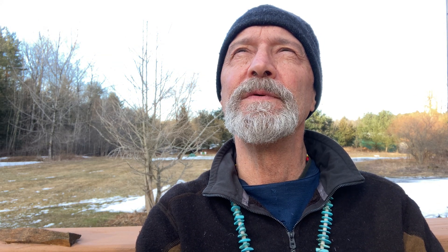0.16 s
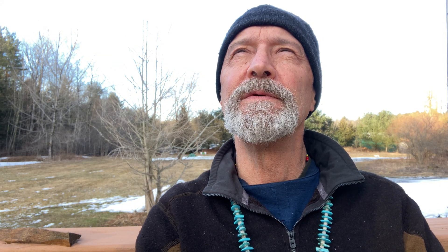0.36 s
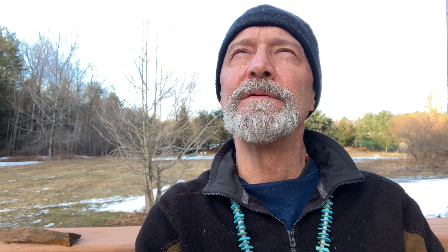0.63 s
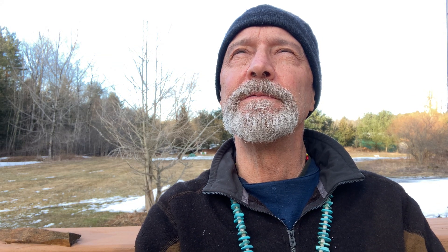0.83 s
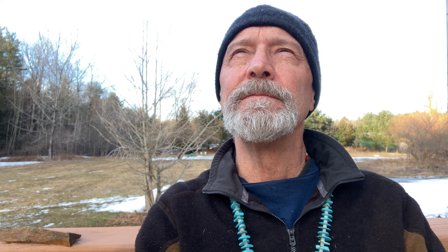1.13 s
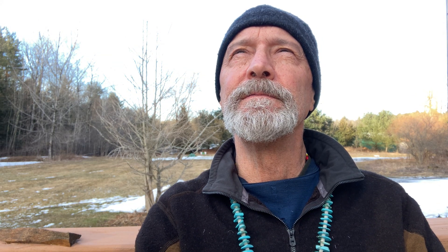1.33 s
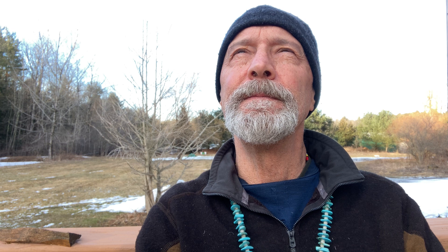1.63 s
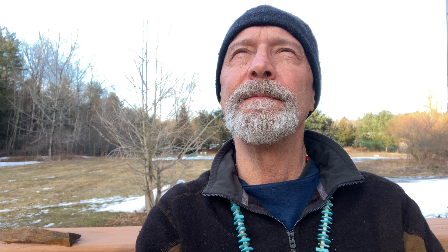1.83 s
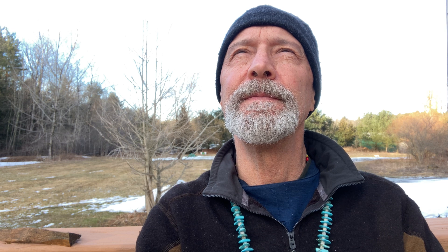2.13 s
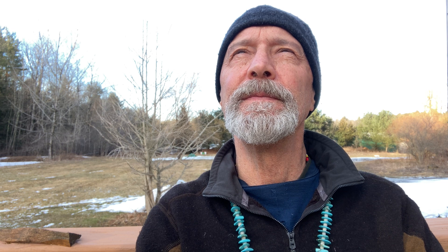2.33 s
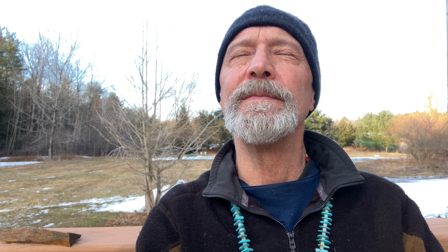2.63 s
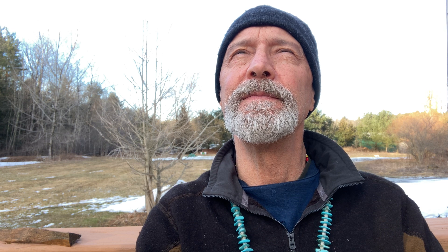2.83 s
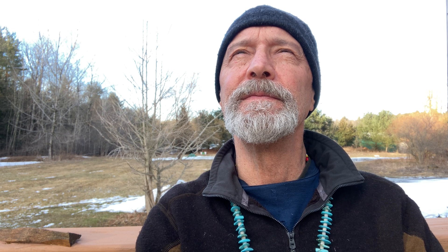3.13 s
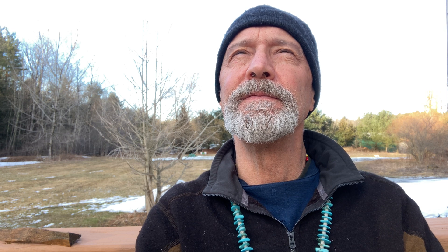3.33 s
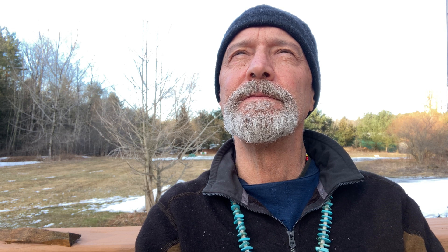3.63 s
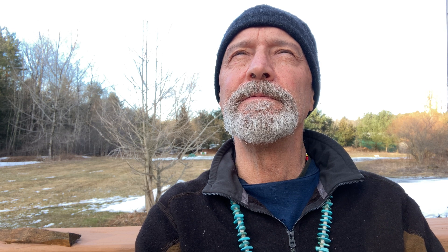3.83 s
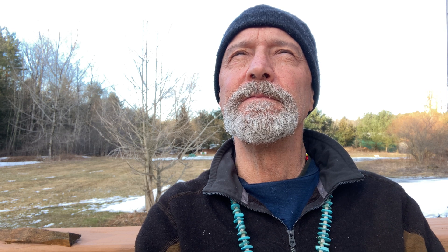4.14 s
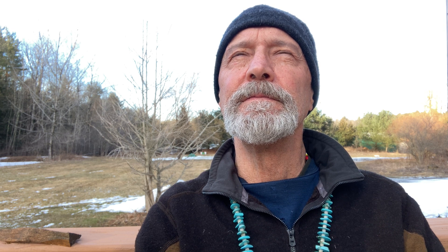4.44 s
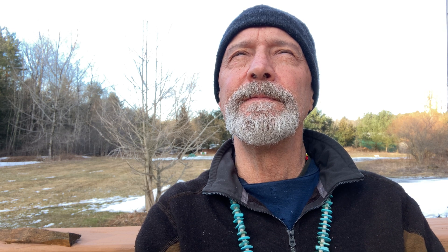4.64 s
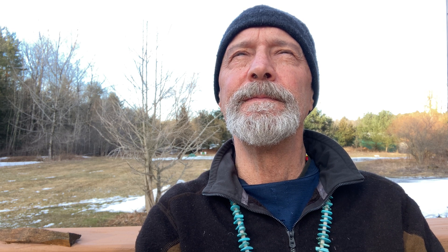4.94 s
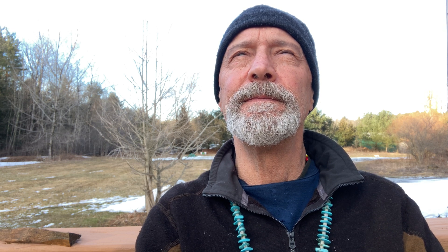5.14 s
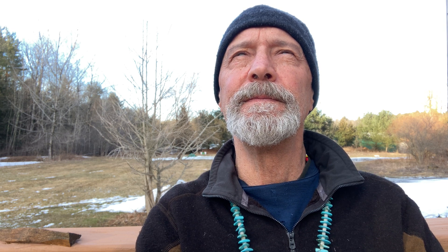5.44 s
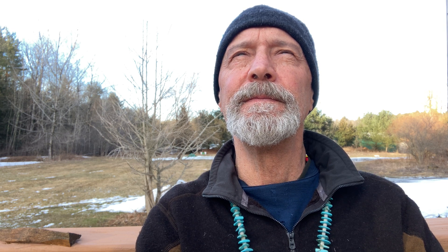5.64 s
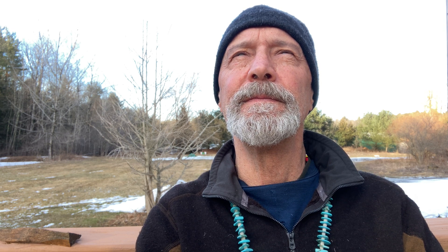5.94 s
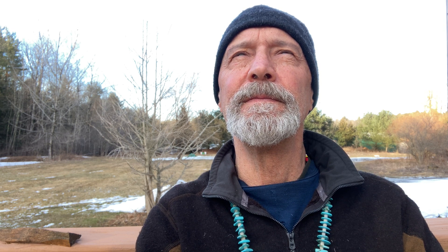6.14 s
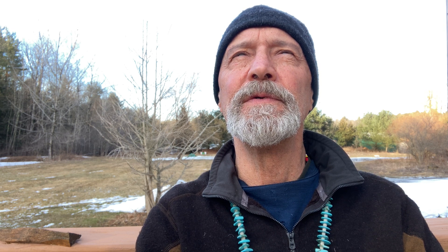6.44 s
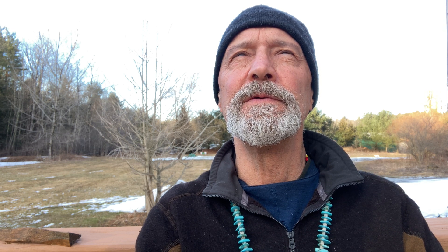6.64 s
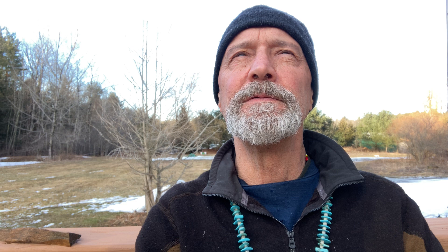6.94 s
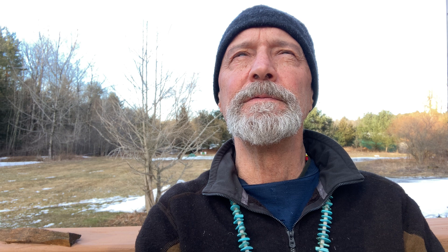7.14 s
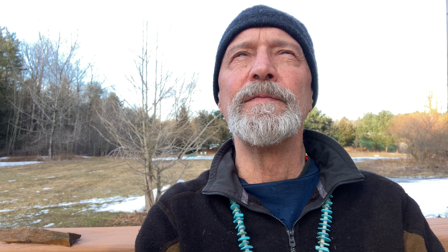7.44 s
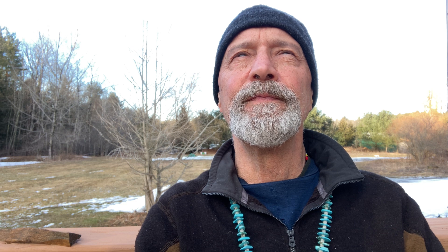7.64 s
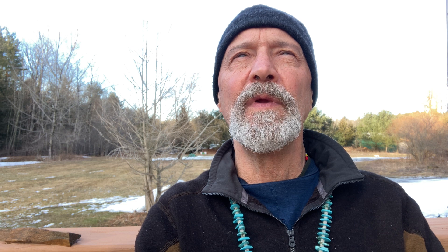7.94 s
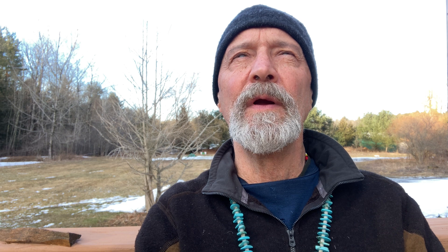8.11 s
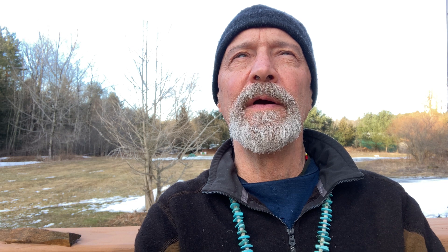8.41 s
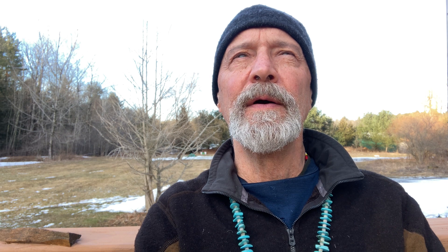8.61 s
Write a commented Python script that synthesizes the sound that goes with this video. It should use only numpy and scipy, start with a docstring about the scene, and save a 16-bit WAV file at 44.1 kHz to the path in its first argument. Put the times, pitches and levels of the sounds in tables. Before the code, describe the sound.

Outdoors, one crow caws fourteen times, raspy and echoing among trees, growing duller and quieter over soft wind buffeting and faint country hush.

```python
"""A crow caws fourteen times from the edge of a wood, softer on the whole as it goes on; a farther one answers once.
Each caw is a hoarse arch of pitch: frayed harmonics and puffed noise through throat and beak resonances.
Noise echoes stand for the trees that scatter and prolong it. Eddies are smooth pushes, cut in the bass;
light wind is lumpy low noise swelling in gusts; ticks, clicks and a faint high chirp are short resonant
bursts over a quiet country hush."""
import sys
import numpy as np
from scipy import signal
from scipy.fft import rfft, irfft, next_fast_len
from scipy.io import wavfile
from scipy.ndimage import map_coordinates

SR = 44100
rng = np.random.default_rng(int(sys.argv[2]) if len(sys.argv) > 2 else 0)


def generate_wav(signal):
    """Clip the signal to [-1, 1] and save it as 16-bit WAV at the path in sys.argv[1]."""
    frames = np.transpose(np.atleast_2d(signal))
    scaled = np.clip(frames, -1, 1) * 32767
    pcm = np.round(scaled).astype(np.int16)
    wavfile.write(sys.argv[1], SR, pcm)


N = 386757


def amp(db):
    """Decibels to gain."""
    return 10 ** (np.asarray(db) / 20)


def unit(x):
    """Scale to rms 1."""
    return x / np.sqrt(np.mean(x ** 2) + 1e-20)


def along(points, hz):
    """Interpolate (Hz, value) points on a log frequency axis."""
    f, v = np.transpose(points)
    return np.interp(np.log(hz + 1), np.log(f + 1), v)


def bell(hz, centre_hz, octaves):
    """A bump of height 1 on a log frequency axis."""
    return np.exp(-(np.log2((hz + 1) / centre_hz) / octaves) ** 2)


def wobble(rate_hz, size):
    """A smooth random curve with rate_hz knots a second."""
    knots = rng.standard_normal(int(size * rate_hz / SR) + 4)
    return map_coordinates(knots, [np.arange(size) * rate_hz / SR])


def filtered(x, response):
    """Multiply the spectrum of x by a response of frequency."""
    n = x.shape[-1]
    m = next_fast_len(n + 4096)
    return irfft(rfft(x, m) * response(np.fft.rfftfreq(m, 1 / SR)), m)[..., :n]


def add(track, start_s, sound):
    """Mix a sound into the track from start_s."""
    i = round(start_s * SR)
    part = sound[..., max(-i, 0):N - i]
    track[..., max(i, 0):max(i, 0) + part.shape[-1]] += part


def rush(spectrum, alike):
    """Stereo noise of rms 1; the mid-side balance sets left-right likeness by frequency."""
    def mid_side_gains(hz):
        turn = np.arccos(np.clip(along(alike, hz), -1, 1)) / 2
        return amp(along(spectrum, hz)) * [np.cos(turn), np.sin(turn)]

    mid, side = filtered(rng.standard_normal((2, N)), mid_side_gains)
    return unit(np.array([mid + side, mid - side]))


def effort(u):
    """Force of a caw, u from its crest: quick attack, swell to the peak, sag, release."""
    hold_from, peak_at, hold_to = -.99, -.37, 1.34
    attack_db, swell_db, sag_db, release_db = 106, 8.5, 4, 56.5  # per unit of u
    arch_db = swell_db * np.maximum(peak_at - u, 0) + sag_db * np.maximum(u - peak_at, 0)
    ends_db = attack_db * np.maximum(hold_from - u, 0) + release_db * np.maximum(u - hold_to, 0)
    return amp(-arch_db - ends_db)


def caw(top_hz, half_s, treble_db, nasal_db, beak_db, throat_scale, length):
    """One caw, crest in the middle: rattling harmonics arch through the throat, with rasp puffed once a cycle."""
    # Throat and beak resonances. Each row: frequency in Hz before throat_scale, gain in dB.
    throat = [(400, -62), (650, -24), (900, -27), (1080, -15), (1200, -3.5), (1300, 2), (1410, 1.5),
              (1510, -10), (1720, -8), (1950, -19), (2300, -25.5), (2900, -37), (3300, -24), (3750, -19),
              (4400, -29), (5300, -22.5), (6050, -26.5), (6900, -74)]
    # Rasp of the syrinx. Each row: frequency in Hz before throat_scale, relative density in dB per Hz.
    rasp_spectrum = [(450, -29.5), (1000, -8), (1350, -11), (1900, -5.5), (2350, -11.5), (2850, -18),
                     (3450, -12), (3950, -14.5), (4450, -18.5), (5300, -14), (6200, -15.5), (7100, -57)]
    # Treble loss of soft caws. Each row: frequency in Hz before throat_scale, share of treble_db that acts.
    softening = [(1750, 0.033), (2300, 0.21), (2900, 0.52), (3400, 0.54), (4200, 0.8), (5300, 1.42),
                 (7000, 1.5)]
    rise_share, low_share = .93, .63  # rise time in half lengths; pitch at the loose ends over top_hz
    rattle_hz, rattle_share = 72, .016
    beak_from_hz, beak_rise_per_half = 2550, .096
    noise_db, ragged_db, rasp_fade_db_per_half = -25, 7, 4

    n = SR // 3
    u = (np.arange(n) - n // 2) / SR / half_s
    # membranes: tight at the crest, loose and ragged at both ends
    slack = 1 - np.exp(-(u / np.where(u < 0, rise_share, 2 - rise_share)) ** 2)
    jitter = (.012 + .03 * slack) * wobble(800, n) + .008 * wobble(150, n)
    # slower, uneven vibration of the syrinx, with a peak at the crest
    turns = np.cumsum(rattle_hz * (1 + .2 * wobble(50, n))) / SR
    rattle = np.cos(2 * np.pi * (turns - turns[n // 2])) - .5
    pitch_hz = top_hz * (1 - (1 - low_share) * slack) * (1 + jitter + rattle_share * rattle)
    phase = 2 * np.pi * np.cumsum(pitch_hz) / SR

    def edge(hz):
        """Treble loss and this caw's own nasal and beak resonances."""
        throat_hz = hz / throat_scale
        soft_db = treble_db * along(softening, throat_hz)
        # the third harmonic sweeps through the nasal resonance
        return amp(soft_db + nasal_db * bell(throat_hz, 1736, .1) + beak_db * bell(hz, 3320, .081))

    def tract(hz, beak):
        """Table frequency; resonances in the octave above beak_from_hz climb with the beak position."""
        upper = (hz > beak_from_hz) * (hz < 2 * beak_from_hz)
        return hz / throat_scale / (1 + beak_rise_per_half * beak * upper)

    beak = np.clip(u, -1, 1)
    voice = np.zeros(n)
    for k in np.arange(1, 14):
        # harmonics flutter independently, from the third up more deeply
        shimmer = unit(amp((2.8 if k < 3 else 4.5) * wobble(130, n)))
        fray = .09 * k * wobble(420, n)  # higher harmonics fray into hoarse noise
        gain = amp(along(throat, tract(k * pitch_hz, beak))) * edge(k * pitch_hz)
        voice += shimmer * gain * np.sin(k * phase + fray)

    puffs = rng.standard_normal(n) * (1 + np.cos(phase))
    rasp = np.zeros(n)
    for position in (-1, 0, 1):  # cross-fade three beak positions
        coloured = filtered(puffs, lambda hz: amp(along(rasp_spectrum, tract(hz, position))))
        rasp += np.maximum(1 - abs(beak - position), 0) * unit(coloured)
    rasp = filtered(rasp, edge) * amp(noise_db + ragged_db * slack - rasp_fade_db_per_half * u)
    return effort(u / length) * (1.247 * voice + rasp)


def trees():
    """Echo paths: trunks and twigs scatter at once, the grove swells after, the depth of the wood rings on longest."""
    # Decay of the deep wood. Each row: frequency in Hz, t60 in seconds.
    wood = [(500, 0.48), (1300, 2.74), (2000, 2.9), (3500, 1.55), (6000, 0.45)]
    early_db, early_t60_s, early_treble_db = -15, .18, 8
    grove_db, grove_t60_s, grove_treble_db = -19, .45, 5
    depth_db, onset_s = -10, .0045  # the depth sounds almost at once

    n = 3 * SR // 2
    t = np.arange(n) / SR
    trunks = rng.standard_normal((2, n)) ** 3 * amp(-60 * t / early_t60_s) * (t > .002)
    trunks = unit(trunks) / np.sqrt(n)
    # twigs scatter the treble most
    trunks = filtered(trunks, lambda hz: amp(along([(1350, 0), (3000, early_treble_db)], hz)))

    grove = unit(rng.standard_normal((2, n)) * t * amp(-60 * t / grove_t60_s)) / np.sqrt(n)
    grove = filtered(grove, lambda hz: amp(along([(1350, .0048), (1900, grove_treble_db)], hz)))

    hz, age_s, z = signal.stft(rng.standard_normal((2, n)), SR, nperseg=256)
    decay = amp(-60 * age_s / along(wood, hz)[:, None])
    onset = 1 - np.exp(-t / onset_s)
    depth = signal.istft(z * decay, SR, nperseg=256)[1][:, :n] * onset
    depth = depth / np.linalg.norm(amp(-60 * t / along(wood, 1400)) * onset)
    clumps = amp(2 * wobble(55, n))  # stands of trees answer one after another
    return amp(early_db) * trunks + amp(grove_db) * grove + amp(depth_db) * clumps * depth


def crow(calls, throat_scale, length, gain_db):
    """Each caw arrives straight, off the ground, off the wood's edge, and scattered through the trees."""
    ground_ms, twigs_db, trunk_db = 3.73, -2.5, -13
    echo_db, echo_s = -18, .07
    out, sides = np.zeros((2, N)), np.array([[1], [-1]])
    for crest_s, top_hz, half_s, db, treble_db, nasal_db, beak_db, pan_db, lead_ms, ground in calls:
        call = caw(top_hz, half_s, treble_db, nasal_db, beak_db, throat_scale, length)
        call = amp(db + gain_db) * call
        start_s = crest_s - len(call) / SR / 2

        def straight_path(hz):
            """Twigs take treble; the left port leads by lead_ms."""
            twigs = amp(along([(2000, 0), (3200, twigs_db)], hz))
            return twigs * np.exp(1j * np.pi * hz * sides * lead_ms / 1000)

        direct = filtered(call, straight_path)
        # gliding harmonics cross the bounce's peaks and notches and break into bursts
        near = filtered(direct, lambda hz: 1 - ground * np.exp(-2j * np.pi * hz * ground_ms / 1000))
        near = near * amp(sides * pan_db / 2 - 1.5)
        add(out, start_s, near)
        add(out, start_s + rng.uniform(.008, .02), amp(trunk_db) * near)
        add(out, start_s + echo_s + rng.normal(0, .0047), amp(echo_db) * direct)

        scattered = signal.fftconvolve(call[None], trees(), axes=1)
        # the scattered sound flickers, differently at each port
        flicker = amp(2 * np.array([wobble(130, scattered.shape[1]) for _ in sides]) - .5)
        add(out, start_s, flicker * scattered)
    return out


def eddies():
    """Each eddy pushes smoothly, a little unlike at the two ports; the microphone's bass cut makes it a falling thud."""
    # Each row: time of the peak in seconds, level in dB before the bass cut, width in seconds.
    pushes = [ (.076, -20.5, 0.0076), (0.396, -29, 0.0074), (0.503, -16, 0.0033), (0.6, -20.5, 0.0083),
              (0.634, -30, 0.0036), (0.743, -31, 0.0057), (0.829, -29, 0.0061), (.88, -26.5, 0.0082),
              (1.239, -22, .0025), (1.667, -24, 0.0061), (2.317, -24.5, 0.0046), (2.338, -23, 0.0049),
              (2.398, -14.5, 0.0045), (2.564, -26.5, 0.0065), (2.588, -16.5, 0.0039), (2.86, -36, 0.0031),
              (2.894, -25.5, 0.0038), (2.969, -19, 0.0045), (2.987, -27, 0.0042), (3.798, -24.5, 0.0046),
              (3.926, -25.5, 0.0057), (4.463, -27.5, 0.0072), (4.572, -29, 0.0041), (4.596, -25, 0.0031),
              (4.81, -19, 0.0048), (4.881, -35, 0.0044), (5.127, -20, 0.008), (8.355, -30, 0.0059),
              (8.52, -27.5, 0.0071), (8.568, -24.5, 0.0076)]
    uneven, bass_cut_hz = .096, 58
    track, t = np.zeros((2, N)), np.arange(-SR // 10, SR // 10) / SR
    for peak_s, db, width_s in pushes:
        flutter = 1 + uneven * np.array([wobble(247.7, len(t)), wobble(250.9, len(t))])
        shape = np.hanning(len(t)) / np.hypot(1, t / width_s) ** 3
        add(track, peak_s + t[0], amp(db) * flutter * shape)
    return signal.sosfilt(signal.butter(5, bass_cut_hz, "high", fs=SR, output="sos"), track)


def wind():
    """Lumpy low buffeting: a calm breeze on which gusts swell and die away, some sharper than others."""
    # Wind on the microphone. Each row: frequency in Hz, relative density in dB per Hz.
    buffet_spectrum = [(12, -32.5), (25, -8), (43, -1), (62, 3), (120, -8.5), (190, -19.5), (270, -37),
                       (400, -33.5), (800, -99)]
    # Each row: time of the peak in seconds, half length in seconds, level in dB before gain_db,
    # sharpness in dB added above split_hz.
    gusts = [ (0.137, 0.17, -52, 1.5), (0.542, 0.11, -40, -9), (0.832, 0.13, -56, -14),
             (1.649, 0.093, -54, 8.5), (1.906, 0.14, -65, 10.5), (2.316, 0.055, -49.5, 1.5),
             (2.916, 0.051, -49.5, 5), (3.27, 0.099, -56, -2), (3.83, 0.24, -57, 5), (4.537, 0.077, -45, 1),
             (4.805, 0.097, -46, -3.5), (5.21, 0.38, -56.5, -1.5), (8.264, 0.24, -56.5, -3),
             (8.54, 0.081, -50, -13)]
    calm_db, gain_db = -66.5, 1  # calm_db is before gain_db
    lumps_db, split_hz = 4, 90

    t = np.arange(N) / SR
    noise = rush(buffet_spectrum, [(60, .81), (300, .92)])
    buffet = unit(amp(lumps_db * wobble(25, N)) * noise)
    deep = filtered(buffet, lambda hz: 1 / (1 + (hz / split_hz) ** 4))

    def swell(sharp_share):
        """Calm and gusts add in power."""
        power = amp(calm_db) ** 2
        for peak_s, half_s, db, sharp_db in gusts:
            rise_and_fall = np.exp(-2 * ((t - peak_s) / half_s) ** 2)
            power = power + amp(db + sharp_share * sharp_db) ** 2 * rise_and_fall
        return np.sqrt(power)

    return amp(gain_db) * (swell(0) * deep + swell(1) * (buffet - deep))


def background():
    """Far hush of open country, low and middle bands swelling each on its own, over the microphone's hiss."""
    # Each row of both spectra: frequency in Hz, relative density in dB per Hz.
    hush_spectrum = [(25, -22), (60, -5), (160, -5.5), (300, -16.5), (480, -10.5), (780, -12),
                     (1000, -15.5), (1270, -14), (1500, -22), (1900, -31.5), (2400, -34.5), (3300, -37.5),
                     (5000, -39.5), (7000, -49.5), (12000, -72)]
    hiss_spectrum = [(3000, -20), (6500, -8), (8700, 0), (11400, -5), (13500, -3), (15200, -3)]
    # Each row: frequency in Hz, left-right likeness from -1 to 1.
    hush_alike = [(60, -0.1), (300, 0.87), (650, 0.23), (1400, -0.14), (3000, -0.12), (14000, 0.065)]
    hush_db, hiss_db, drift_db = -64.5, -83.7, 1.64

    sway = amp(.6 * wobble(4, N))
    hush = amp(hush_db) * sway * rush(hush_spectrum, hush_alike)
    for centre_hz in (330, 750):
        band = filtered(hush, lambda hz: bell(hz, centre_hz, .72))
        hush = hush + band * (amp(drift_db * wobble(4.6, N)) - 1)
    return hush + amp(hiss_db) * rush(hiss_spectrum, [(8000, 0)])


def ticks():
    """Tiny short sounds, ticks, clicks and a faint high chirp: noise that dies at once, through a band-pass."""
    # Each row: start in seconds, peak in dB, centre in Hz, width in octaves (at least 0.1 is used).
    short_sounds = [ (0.958, -70, 2470, 0.486), (3.188, -68.5, 3010, 3.6), (4.29, -71, 4370, 0.22),
                    (4.546, -45, 925, 0.66), (4.547, -63.5, 2450, 0.22), (4.547, -64, 4680, 0.39),
                    (6.599, -51.5, 1224, 0.25), (7.623, -68, 9500, 0.23), (7.828, -70, 2750, 1.3),
                    (8.11, -57.5, 2670, 0.56), (8.622, -64, 14800, .39)]
    t60_s = .048
    out, t = np.zeros((2, N)), np.arange(SR // 10) / SR
    for start_s, db, centre_hz, octaves in short_sounds:
        band_hz = centre_hz * 2.0 ** (np.array([-1, 1]) * max(octaves, .1) / 2)
        band_hz = np.clip(band_hz, 20, SR / 2 - 1)
        noise = rng.standard_normal(len(t)) + .5 * rng.standard_normal((2, len(t)))
        burst = noise * amp(-60 * t / t60_s)
        click = signal.sosfilt(signal.butter(2, band_hz, "band", fs=SR, output="sos"), burst)
        add(out, start_s, amp(db) * click / np.abs(click).max())
    return out


def scene():
    """Crows in the wood, wind and tiny short sounds at the microphone."""
    # Each row of both: crest in seconds, nominal top pitch in Hz, half length of the pitch arch in seconds,
    # level in dB before gain_db, treble change of the caw in dB (weighted by the softening shares),
    # nasal resonance in dB, beak resonance in dB, left-right balance in dB, lead at the left port in ms,
    # ground bounce 0-1.
    near_calls = [ (.117, 636.3, 0.064, -47, -5.5, 1.5, -1, 6, 0.2, 0),
                  (.630, 668.4, 0.057, -48.5, -1, 1, 0, 5, 0.074, 0.74),
                  (1.252, 638, 0.066, -47.5, -7, 6.5, 6, 4.5, 0.21, 0),
                  (1.768, 669.6, 0.065, -48.5, -7, -1.5, 1, 6.5, 0.16, 0.72),
                  (2.275, 670.3, 0.063, -50, -4.5, 3.5, -3, 5, 0.19, .55),
                  (2.847, 651.2, 0.061, -49.5, -4.5, -1.5, 4.5, 5.5, 0.068, 0.12),
                  (3.527, 642.2, 0.06, -49, -15.5, -4, -4, 4.5, 0, 0.14),
                  (4.076, 654, 0.059, -53, -15.5, -1.5, -1, 2.5, -0.13, 0),
                  (4.675, 666, 0.057, -50.5, -21, 4, -3, 1.5, .23, 0),
                  (5.419, 646.7, .062, -55, -30, 0.5, 3, 7, 0.11, 0.1),
                  (6.184, 640, 0.057, -55, -22, -3, 9, 9.5, 0.035, 0.4),
                  (6.945, 644, 0.054, -54.5, -24, -2.5, 3, 3.5, -0.14, 0.05),
                  (7.667, 652, 0.054, -57, -23, -10, 5, 6.5, -0.15, 0),
                  (8.252, 650.6, 0.063, -55, -24, 2.5, -1, 10, .036, 0)]
    far_calls = [(7.448, 718, .055, -65, -26, 12.7, 0, -7, -0.053, .05)]
    # length: span of the force relative to the pitch arch
    birds = crow(near_calls, throat_scale=.97, length=.92, gain_db=4)
    birds = birds + crow(far_calls, throat_scale=1.116, length=.68, gain_db=1.5)
    return birds + eddies() + wind() + background() + ticks()


def record(dry):
    """Band limit: nothing is kept from 15260 Hz up."""
    return filtered(dry, lambda hz: hz < 15260)


dry = scene()
out = record(dry)
generate_wav(out)
```